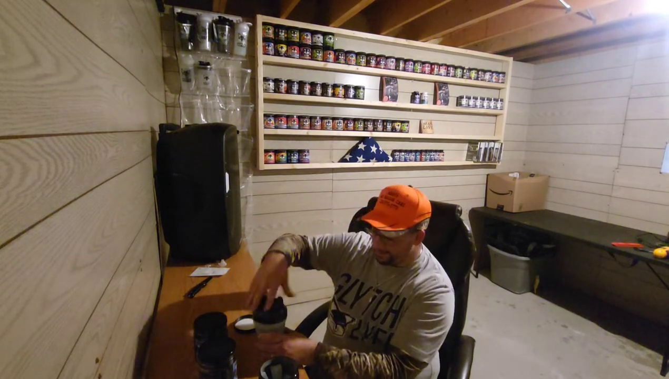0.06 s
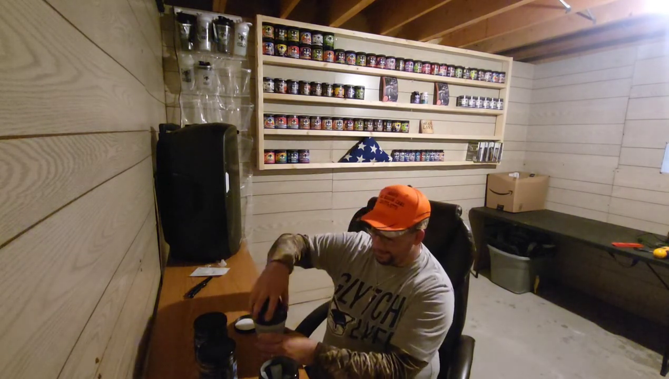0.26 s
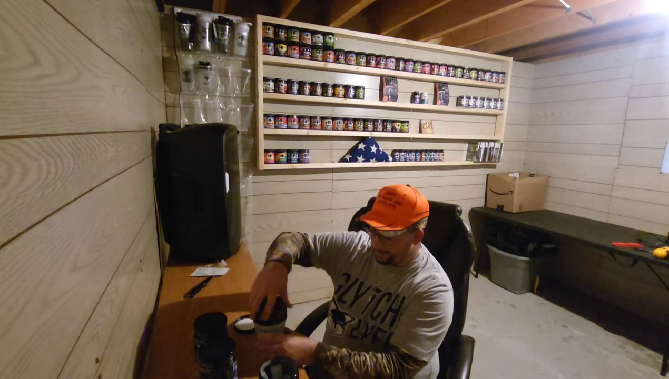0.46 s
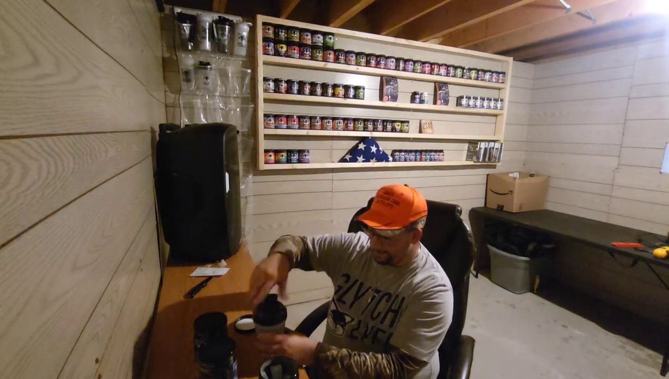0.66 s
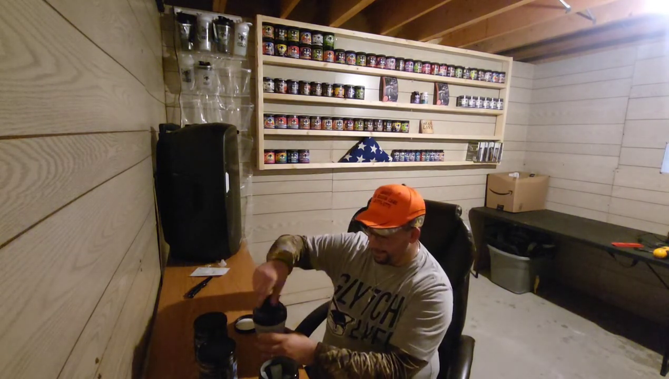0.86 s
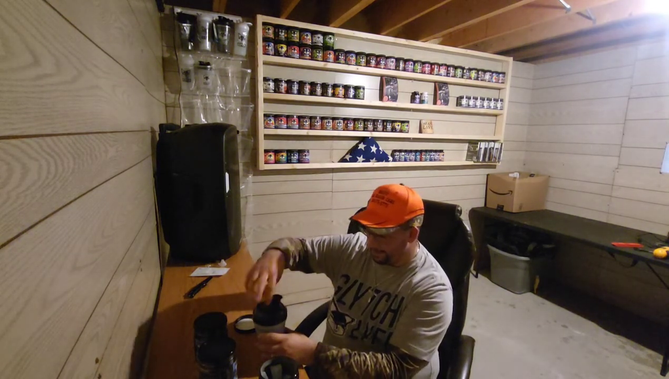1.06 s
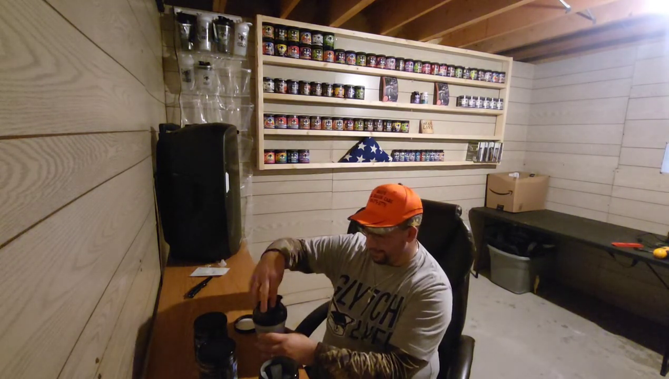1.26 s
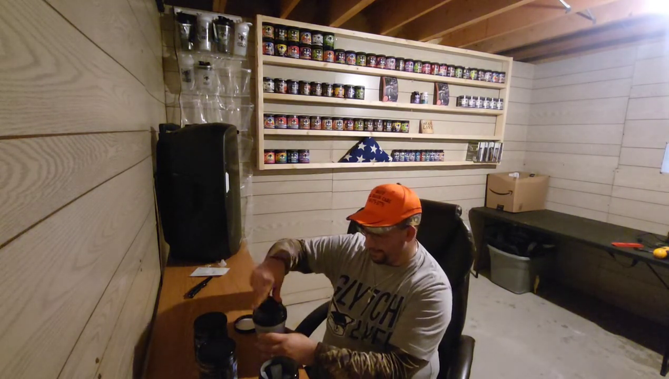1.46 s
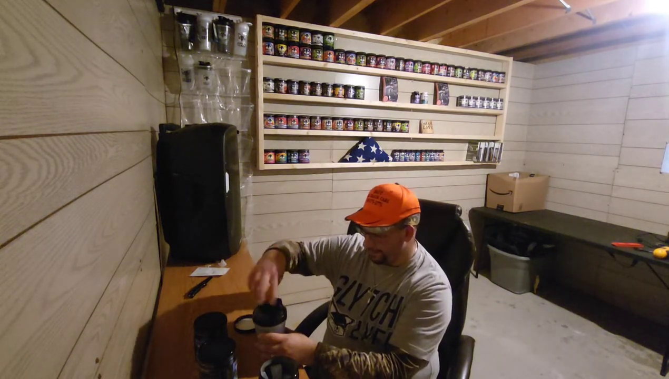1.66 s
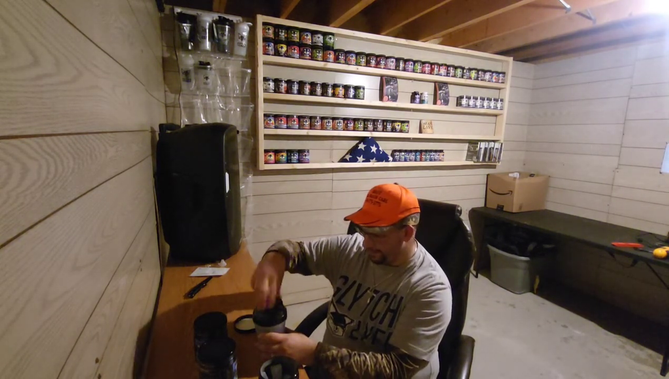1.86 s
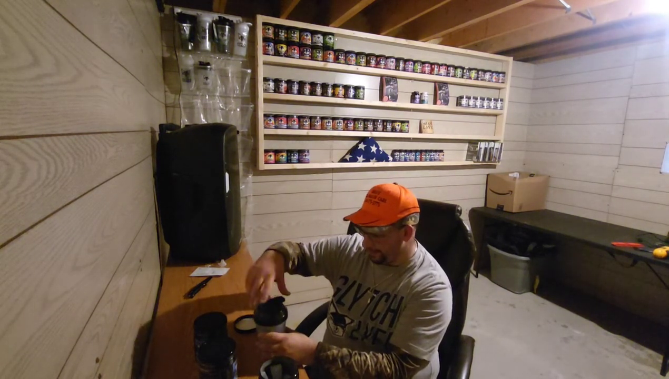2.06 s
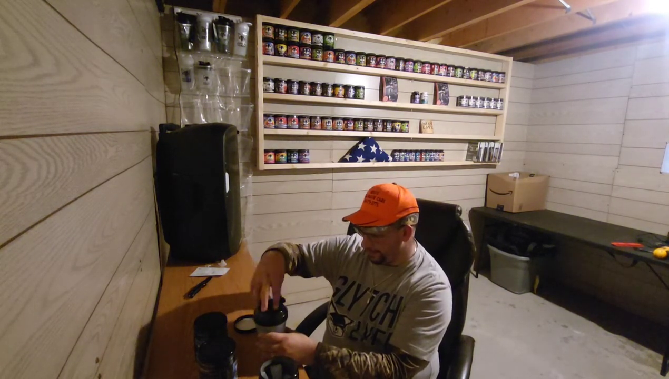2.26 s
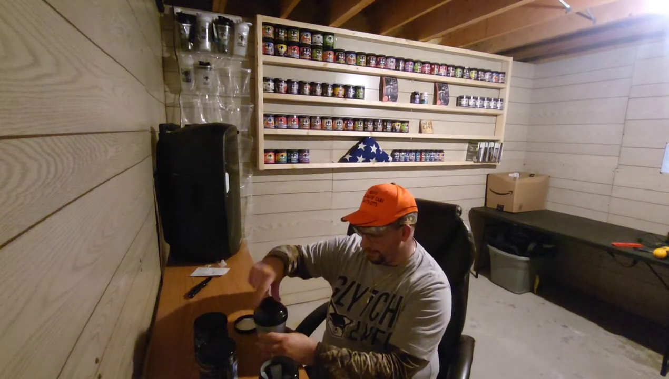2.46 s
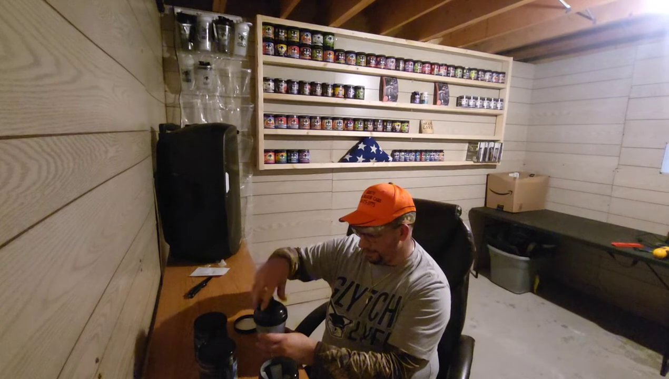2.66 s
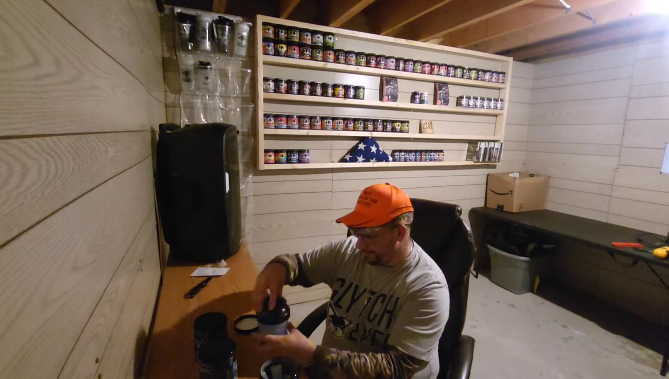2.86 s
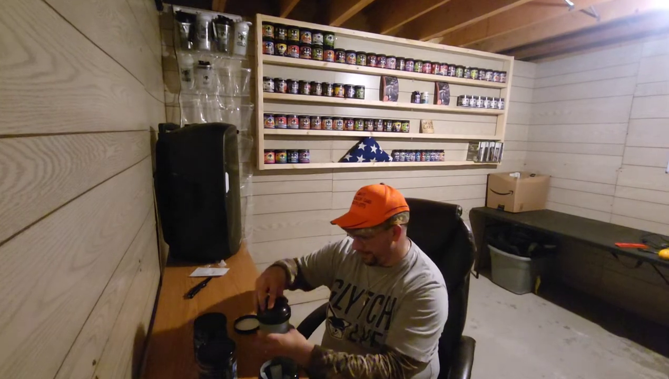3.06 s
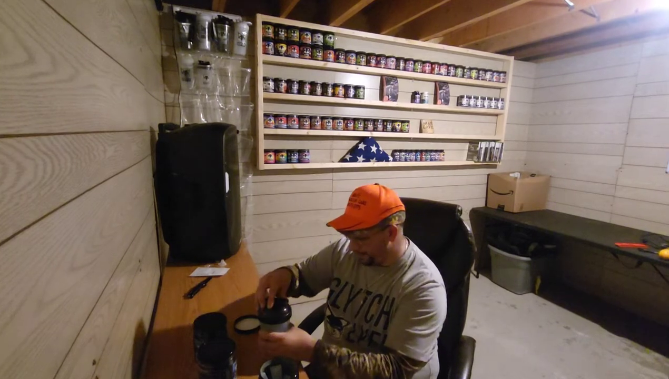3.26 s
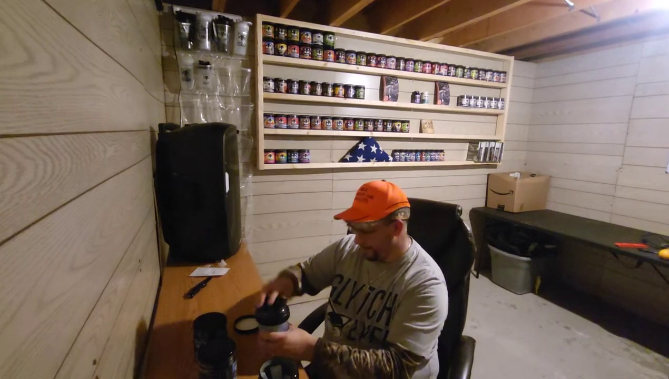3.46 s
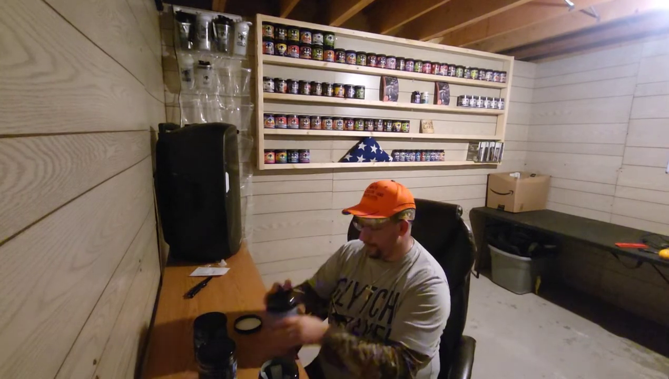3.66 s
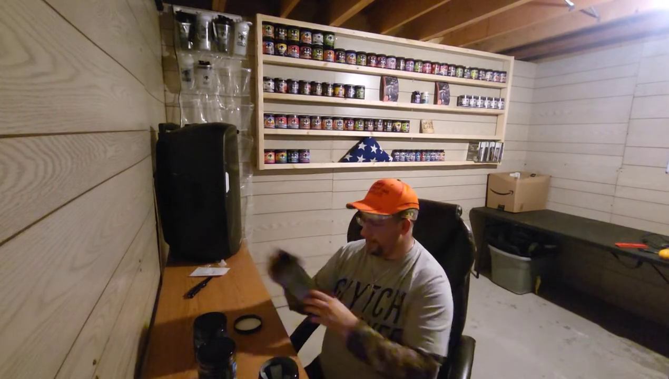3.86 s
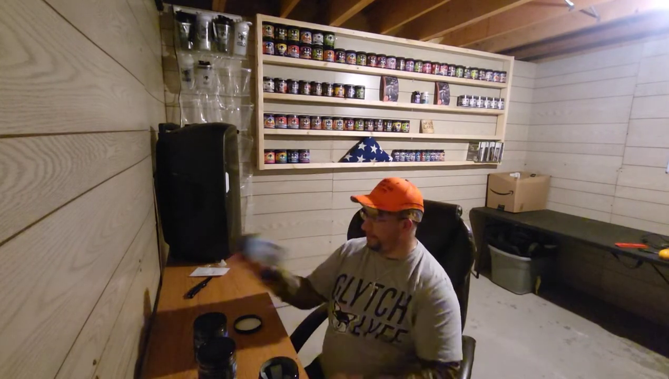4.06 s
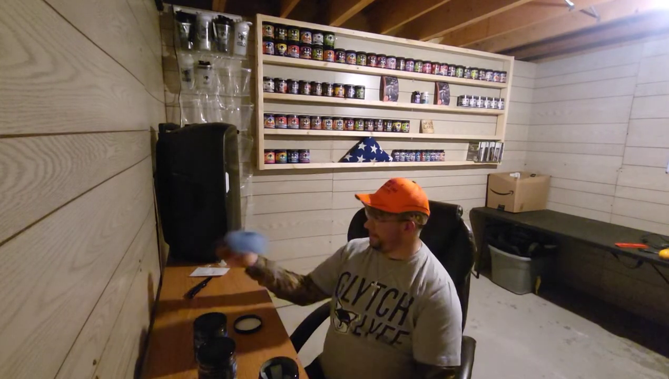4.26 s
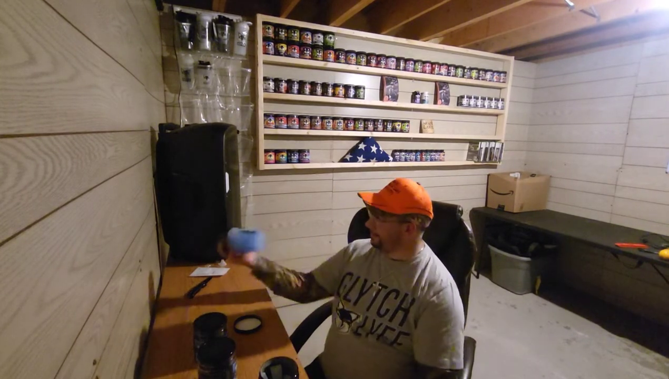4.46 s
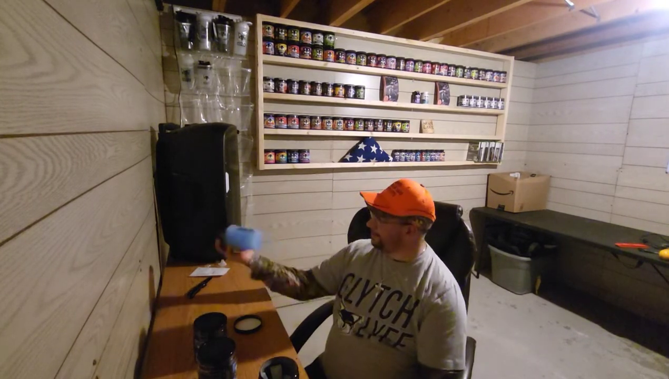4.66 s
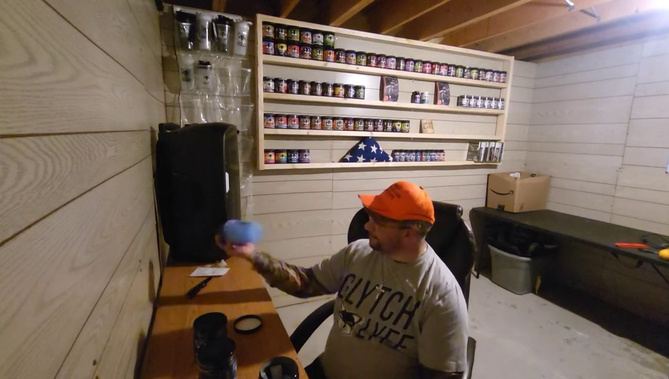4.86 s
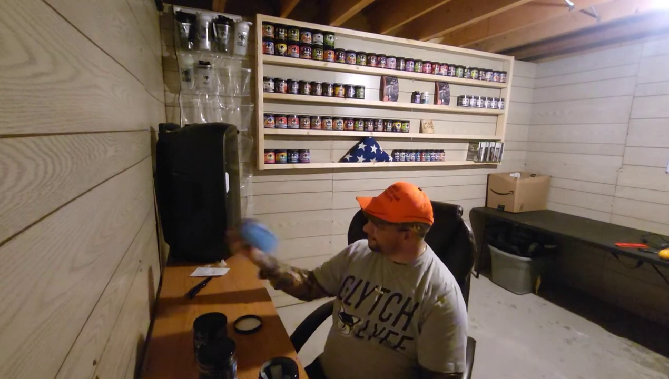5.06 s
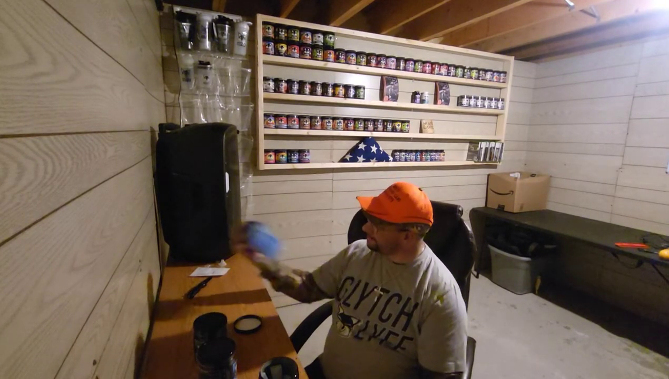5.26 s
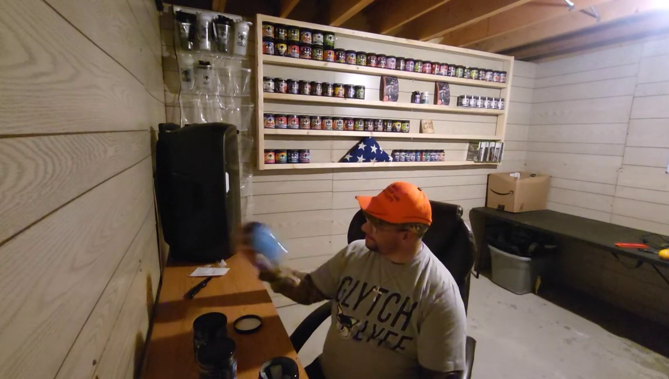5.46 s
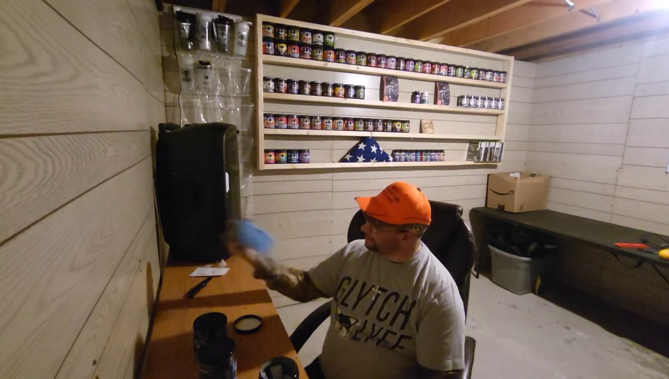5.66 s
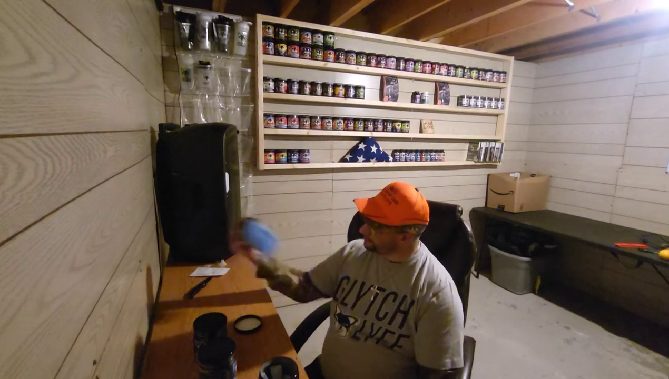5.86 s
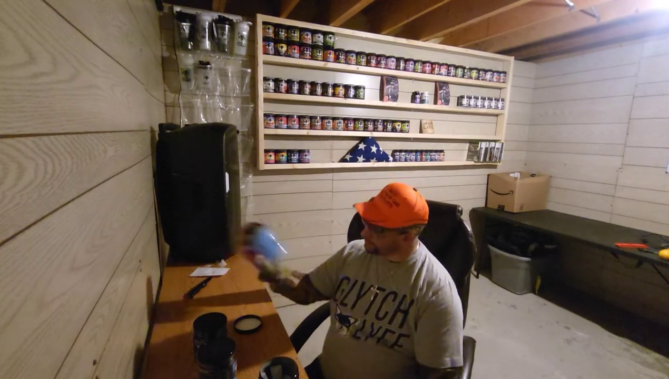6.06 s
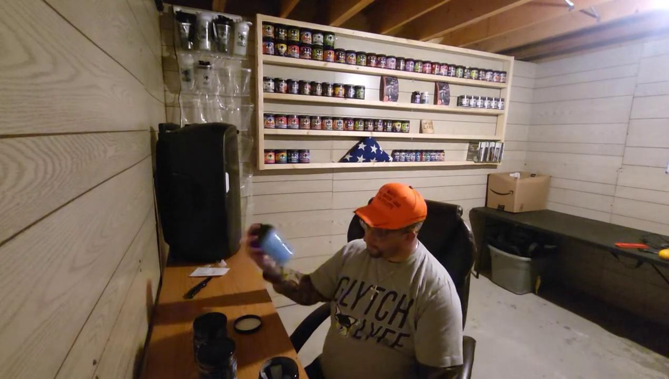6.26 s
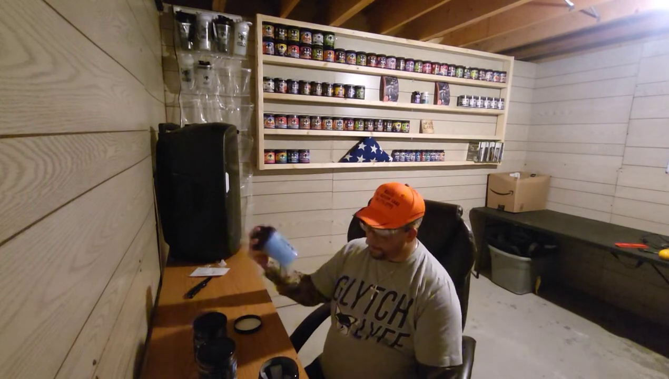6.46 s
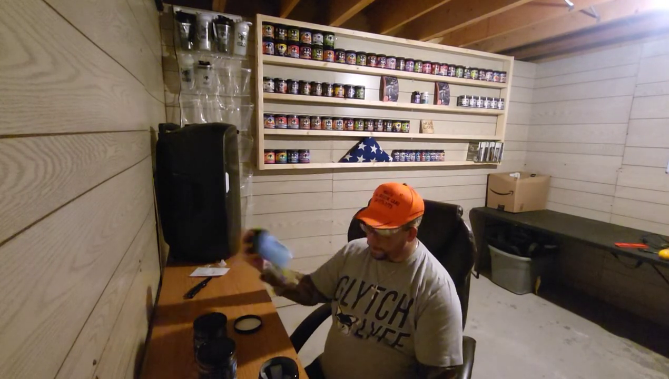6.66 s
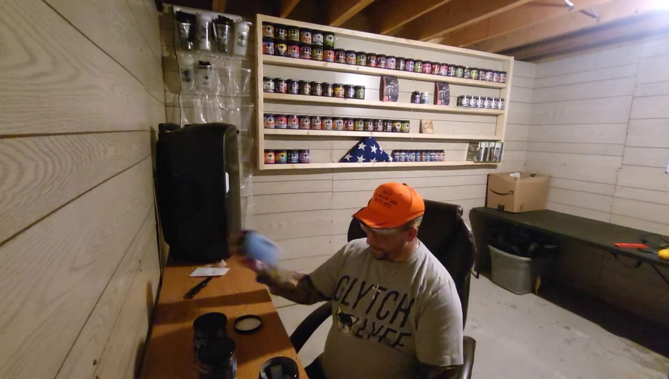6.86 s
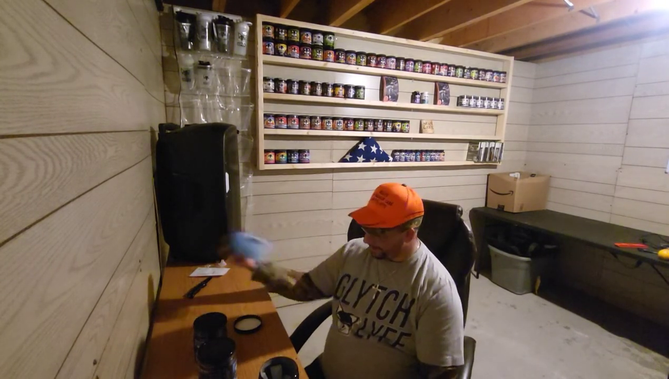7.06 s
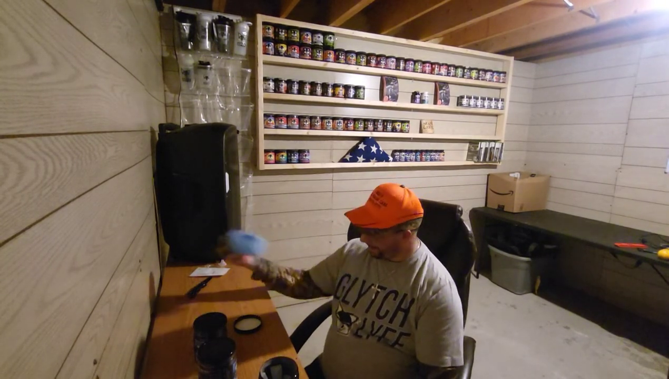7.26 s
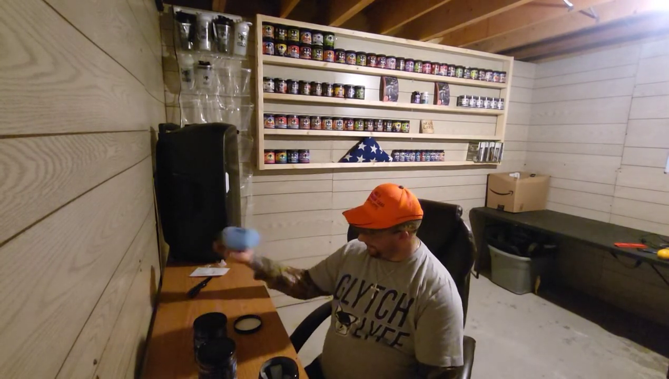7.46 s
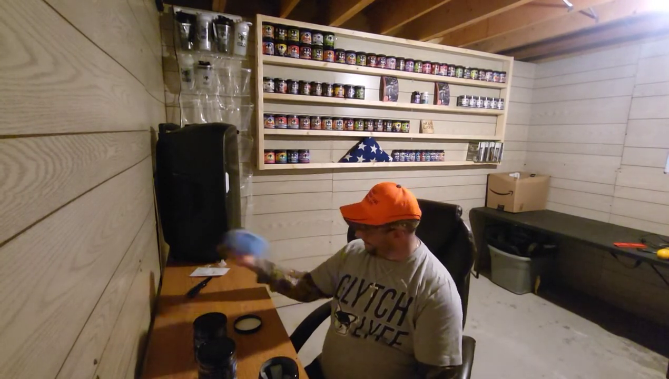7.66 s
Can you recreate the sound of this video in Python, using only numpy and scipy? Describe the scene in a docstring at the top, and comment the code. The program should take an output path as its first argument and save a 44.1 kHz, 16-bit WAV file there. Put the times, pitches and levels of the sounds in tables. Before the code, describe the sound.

A faint, low hush fills a small room with hard walls. From the start until about 3.4 seconds, a lid is rubbed and pressed onto a plastic shaker cup: short, soft scrapes alternate with irregular clicks, hollow knocks and dull thuds through a desk. The clearest pushes come near 0.4, 1.1, 1.6, 2.1 and 2.6 seconds, and some make the ice inside chime thinly. At about 3.8 seconds one cube ticks as the cup is lifted. From about 4.1 seconds to the end, near 7.6 seconds, the cup is shaken hard, much louder than before, at nearly five back-and-forth shakes a second. Ice cubes clack and crunch against the plastic while water splashes, slaps and now and then gulps air. Everything is heard from fairly near, with a short room echo.

```python
"""A plastic shaker cup of ice and water in a small, quiet basement room with hard walls.
First the lid is rubbed and pushed on: it scrapes and clicks, the cup thuds on the desk, the ice chimes.
Near 3.8 s one cube slips as the cup is lifted. From about 4 s to 7.6 s the cup is shaken hard.
Two strokes take turns: a return slaps the water back and often gulps air, and a throw cracks
the ice on the far end under a swell of spray."""
import sys
import numpy as np
from scipy import signal
from scipy.fft import rfft, irfft, next_fast_len
from scipy.io import wavfile
from scipy.ndimage import map_coordinates

SR = 44100
rng = np.random.default_rng(int(sys.argv[2]) if len(sys.argv) > 2 else 0)


def transcribe(signal):
    """Save signal, clipped to [-1, 1], as a 16-bit WAV file at the path in sys.argv[1]."""
    frames = np.atleast_2d(signal).T
    limited = np.clip(frames, -1, 1)
    pcm = np.round(limited * 32767).astype(np.int16)
    wavfile.write(sys.argv[1], SR, pcm)


N = 340011


def amp(db):
    """Turn decibels (dB) into a number to multiply by."""
    return 10 ** (np.asarray(db) / 20)


def unit(x):
    """Scale x to an average power of 1."""
    return x / np.sqrt(np.mean(x ** 2) + 1e-20)


def along(points, hz):
    """Read between (Hz, value) points, with octaves evenly spaced."""
    freqs, values = np.transpose(points)
    return np.interp(np.log(hz + 1), np.log(freqs + 1), values)


def add(track, s, x):
    """Mix x into the track, starting at s seconds."""
    part = track[..., max(round(s * SR), 0):][..., :x.shape[-1]]
    part += x[..., :part.shape[-1]]


def filtered(x, response):
    """Multiply each frequency in x by response(hz)."""
    size = next_fast_len(x.shape[-1] + SR // 4)
    return irfft(rfft(x, size) * response(np.fft.rfftfreq(size, 1 / SR)), size)[..., :x.shape[-1]]


def coloured(x, points, size=4096):
    """Give x the tone drawn by (Hz, dB) points, using a filter of energy 1."""
    cepstrum = irfft(np.log(amp(along(points, np.fft.rfftfreq(size, 1 / SR)))))
    cepstrum[1:size // 2] *= 2  # folded so that nothing sounds before a hit
    cepstrum[size // 2 + 1:] = 0
    kernel = irfft(np.exp(rfft(cepstrum)))
    return signal.oaconvolve(x, kernel / np.linalg.norm(kernel))[:len(x)]


def resonated(x, modes, size=16384):
    """Let x ring an object whose notes are given as (pitch Hz, width Hz, dB); narrow ones last longer."""
    f = np.fft.rfftfreq(size, 1 / SR)
    kernel = irfft(sum((-1) ** k * amp(db) * 1j * f * width / (hz * hz - f * f + 1j * f * width)
                       for k, (hz, width, db) in enumerate(modes)))
    return signal.oaconvolve(x, kernel / np.linalg.norm(kernel))[:len(x)]


def grains(rate, spread_db, smooth):
    """Tiny hits of random size, about `rate` a second, mixed with smooth noise."""
    hits = (rng.random(N) < rate / SR) * rng.choice([-1, 1], N)
    sizes = amp(spread_db * np.clip(rng.standard_normal(N), -2, 2))
    return unit(unit(hits * sizes) + smooth * rng.standard_normal(N))


def contact(chatter, t60):
    """A blow and a brief chatter of two surfaces; t60 is the seconds taken to fade by 60 dB."""
    t = np.arange(SR // 10) / SR
    blow = rng.standard_normal(len(t)) * amp(-60 * t / t60)
    blow *= chatter / np.linalg.norm(blow)
    blow[0] = 1
    phase = np.angle(rfft(blow, 2 * len(t)))
    blow = irfft(np.exp(1j * phase))[:len(t)]  # all frequencies equally strong, so no pitch
    return blow / np.linalg.norm(blow)


# The room's background. Each row: frequency in Hz, level in dB.
HUSH_TONE = [(25, -9), (130, -13), (400, -13.5), (1000, -23.5), (5000, -33), (15000, -40.5)]
def hush():
    """A faint, low noise fills the room throughout."""
    return amp(-68.5) * np.array([coloured(rng.standard_normal(N), HUSH_TONE) for _ in range(2)])


def slide_pressure(length, growth_db=8, attack_s=0.017, release_s=0.035):
    """The pressure of one slide starts quickly, grows steadily, then lets go."""
    t = np.arange(SR) / SR
    growth = amp(growth_db * np.minimum(t / length - 1, 0))
    return (1 - np.exp(-t / attack_s)) * growth * np.exp(-np.maximum(t - length, 0) / release_s)


# The three tones of sliding plastic. Each row: frequency in Hz, level in dB.
SCRAPE_TONE = [(300, -10.5), (700, -2.5), (1400, 9), (2500, 6.5), (4000, 0), (6300, 1), (8300, -16.5),
               (11000, -15), (15500, -32)]
HISS_TONE = [(150, -53), (1000, -19.5), (3000, 3.5), (6300, 5.5), (8300, -7), (11000, 2), (15500, -7)]
RUMBLE_TONE = [(25, -29), (80, -16), (150, 6), (330, 4), (480, -7.5), (800, -3.5), (1200, -27), (3000, -44),
               (8000, -40.5)]
# Lid, fingers and sleeve slide. Each row: start and end in seconds, then rumble, scrape and hiss in dB.
SLIDES = [(0.034, 0.07, -50, -52, -82), (0.245, 0.256, -43.5, -53, -78), (.59, 0.661, -48, -44.5, -58),
          (0.865, 0.903, -44, -52, -86), (0.969, 1.054, -46, -52, -72), (1.296, 1.302, -46.5, -58, -70),
          (1.47, 1.534, -38, -39, -53), (1.899, 1.97, -53.5, -68, -100), (1.983, 2.114, -44, -54, -52.5),
          (2.524, 2.565, -41, -50, -57.5), (2.729, 2.831, -51, -64.5, -90), (2.947, 3.002, -48, -44, -95),
          (3.16, 3.34, -64, -60, -81), (3.627, 3.823, -54, -54, -79), (3.959, 4.002, -61.5, -44, -88)]
def rubbing():
    """Sliding plastic sticks and slips: a scrape and a fine hiss above the rumble of the cup."""
    rumble, scrape, hiss = np.zeros((3, N))
    for start, end, rumble_db, scrape_db, hiss_db in SLIDES:
        pressure = slide_pressure(end - start)
        add(rumble, start, amp(rumble_db) * pressure)
        add(scrape, start, amp(scrape_db) * pressure ** 0.65)
        add(hiss, start, amp(hiss_db) * pressure ** 3.4)  # only a tight fit hisses
    scrape = coloured(scrape * grains(rate=370, spread_db=2.5, smooth=1.0), SCRAPE_TONE)
    hiss = coloured(hiss * grains(rate=2200, spread_db=17, smooth=0.84), HISS_TONE)
    rumble = coloured(rumble * grains(rate=58, spread_db=-2.5, smooth=0.43), RUMBLE_TONE)
    return amp(-7.5) * scrape + amp(10) * hiss + rumble


# Notes of the thud, which include the room's low standing waves near 74 and 135 Hz, then of the lid's rim and
# of the air in the cup. Each row: pitch in Hz, width in Hz, level in dB.
THUD_NOTES = [(56, 16, -11), (73.8, 7.9, -0.5), (135.4, 13.8, 3), (164, 18, -2), (198, 56, -2),
              (251.4, 46, -1.5), (333, 122, -1.5), (381, 192, -5.5)]
RIM_NOTES = [(1220, 140, 5.5), (1560, 140, 8), (2090, 55, -12), (2550, 214, 10), (3420, 30, -8),
             (4300, 21, 8.5), (5090, 53, -6.5)]
AIR_NOTES = [(584, 90, 0.5), (686, 110, -2), (815, 85, -6.5)]
# The tones of a knock on the cup and of a sharp click. Each row: frequency in Hz, level in dB.
KNOCK_TONE = [(100, -14), (340, 8.5), (460, -9.5), (600, 2), (720, 2.5), (825, 3.5), (950, -2.5),
              (1300, -9), (1800, -15.5), (2600, -25.5), (4000, -47), (9000, -76)]
CLICK_TONE = [(60, -32), (300, -19), (1200, -7), (2000, 1.5), (2550, -1), (3000, -4.5), (4200, 0),
              (6500, -4), (8300, -15.5), (11000, -12), (15500, -22.5)]
# Pushes on the lid. Each row: start in seconds, then desk thud, cup knock, rim click and air ring in dB.
PUSHES = [(0.269, -11, -19, -37, -21), (0.328, -4.5, -32, -27, -14), (0.368, -3.5, -9.5, -5.5, -19),
          (.478, -14, -23, -42, -32), (.584, -10.5, -14.5, -16.5, -8.5), (0.943, -10, -29, -17.5, -11),
          (1.014, -14, -18.5, -22.5, -33), (1.069, -7, -2.5, -0.5, -21), (1.339, -19, -40, -33, -43),
          (1.58, -2, -1, 2, -22), (1.983, -25.5, -31, -40, -27), (2.119, 8.5, -5, 1.5, -5),
          (2.131, -21, 6.5, -24, -5), (2.148, 2.5, 1.5, -12, -18), (2.58, -3, -10.5, -41, -23),
          (2.648, 7.5, 2, -34, -12), (2.933, -0.5, -14, -46, -20), (2.953, -7, -18, -42, -17),
          (3.101, -14.5, -22, -20, -26.5), (3.127, -32, -13.5, -8.5, -25), (3.367, -39, -30.5, -31, -45)]
def lid():
    """Each push thuds through the desk, knocks the hollow cup and clicks the rim."""
    thud, knock, click, air, rim = np.zeros((5, N))
    for s, thud_db, knock_db, click_db, air_db in PUSHES:
        add(air, s, amp(air_db - 2) * contact(chatter=3, t60=0.1))
        grip_shift = 1 + 0.053 * rng.uniform(-1, 1)  # each grip changes the rim's pitch
        gripped = [(hz * grip_shift, width, db) for hz, width, db in RIM_NOTES]
        add(thud, s, amp(thud_db) * contact(chatter=0.49, t60=0.052))
        # the rim first catches lightly, snaps home, then slips a little further
        for delay, touch_db in [(-.004, -13), (0, 0), (.007, -13.5), (.019, -21.5)]:
            add(knock, s + delay, amp(knock_db + touch_db) * contact(chatter=1.57, t60=0.052))
            snap = amp(click_db + touch_db) * contact(chatter=0.99, t60=0.021)
            add(click, s + delay, snap)
            add(rim, s + delay, resonated(snap, gripped, size=4096))
    for s, _, rumble_db, _, _ in SLIDES:  # the fingers land softly as each slide starts
        add(thud, s, amp(rumble_db + 27.5) * contact(chatter=0.23, t60=0.072))
        add(knock, s, amp(rumble_db + 17.5) * contact(chatter=3.4, t60=0.1))
    desk = filtered(resonated(thud, THUD_NOTES), lambda hz: 1 / (1 + 1j * hz / 900) ** 2)  # dull the treble
    cup = resonated(air, AIR_NOTES) + coloured(knock, KNOCK_TONE)
    return desk + cup + amp(-2) * coloured(click, CLICK_TONE) + amp(-3) * rim


# The notes in one chime. Each row: multiple of the pitch, level in dB, seconds to fade by 60 dB.
CHIME_NOTES = [(0.999, 8, 0.11), (1.053, -5, 0.4), (1.65, -6, 0.12)]
# Ice is jolted in the resting cup. Each row: start in seconds, level in dB, pitch in Hz.
JOLTS = [(.368, -51.5, 2090), (1.071, -43, 2446), (1.578, -44.5, 2185), (2.121, -49, 2400)]
def chimes():
    """A jolted cube rings thinly after a push; the moving water makes its notes waver."""
    out = np.zeros(N)
    t = np.arange(SR) / SR
    for s, db, hz in JOLTS:
        wander = np.cumsum(rng.standard_normal((len(CHIME_NOTES), SR)), axis=1) * 9 / np.sqrt(SR)
        for (ratio, note_db, t60), phase in zip(CHIME_NOTES, wander):
            fade = amp(db + 3.5 + note_db - 60 * t / t60)
            add(out, s, fade * np.sin(2 * np.pi * hz * ratio * t + phase))
    return out


REPEAT_S, REPEAT_DB = .009, -4.5  # a softer repeat of each clack 9 ms later, like a close echo
# The notes of one loose cube. Each row: pitch in Hz, width in Hz, level in dB.
CLINK_NOTES = [(2290, 60, 3), (2560, 180, 6), (3630, 230, -7), (5600, 260, -1), (6480, 390, -4.5)]
def clink(start_s=3.834, db=-14.5):
    """One cube slips as the cup is lifted and ticks against the wall; a softer repeat follows."""
    ticks = np.zeros(N)
    add(ticks, start_s, amp(db) * contact(chatter=1.1, t60=0.026))
    add(ticks, start_s + REPEAT_S, amp(db + REPEAT_DB) * contact(chatter=0.9, t60=0.017))
    return resonated(ticks, CLINK_NOTES) + amp(-4) * coloured(ticks, CLICK_TONE)


CUP_HZ = 2253  # the cup wall's own pitch
# The notes of ice hitting the wall. Each row: multiple of the clack's pitch, width in Hz, level in dB.
CLACK_NOTES = [(.82, 487, -9), (1, 397, 2.5), (1.85, 298, -18), (2.25, 300, -9), (2.7, 298, -19)]
def cube_strikes(strikes, reach_hz=130):
    """Each clean clack has a softer, blurred repeat; a clack near the wall's pitch leaves it ringing."""
    clacks, cracks, pings = np.zeros((3, N))
    for s, clack_db, crack_db, hz in strikes:
        notes = [(hz * ratio, width, db) for ratio, width, db in CLACK_NOTES]
        for at, offset_db, chatter in [(s, 0, .45), (s + REPEAT_S, REPEAT_DB, 1.6)]:
            clack = resonated(contact(chatter, t60=0.063), notes, size=4096)
            add(clacks, at, amp(clack_db + offset_db) * clack)
            add(cracks, at, amp(crack_db + offset_db) * contact(chatter, t60=0.04))
        nearness = 1 / (1 + ((hz - CUP_HZ) / reach_hz) ** 2)
        add(pings, s, np.array([amp(clack_db + 1) * nearness]))
    return clacks + coloured(cracks, CLICK_TONE) + resonated(pings, [(CUP_HZ, 24, 0)])


# Large cubes strike. Each row: start in seconds, clack in dB, crack in dB, clack pitch in Hz.
LARGE_STRIKES = [(3.972, -25, -36, 2250), (4.159, -6.5, -13, 2180), (4.222, 2, -1, 1980),
                 (4.303, -4.5, -17, 1900), (4.423, 0, -11, 1940), (4.605, -4.5, -11, 2250),
                 (4.826, -3, -9, 2170), (5.002, 0.5, -12, 2070), (5.051, -9, -9, 2100),
                 (5.256, -2, -6, 1990), (5.466, 2, -8, 2210), (5.641, -0.5, -4, 2520),
                 (6.645, -6, -10, 1900), (6.71, -3.5, -14, 2130), (6.978, -8, -8, 2130),
                 (7.186, -0.5, -16, 2130), (7.403, 7, -3, 2260), (7.447, -6, -20, 2330)]
def large_cubes():
    """The big pieces of ice clack against the wall one at a time."""
    return cube_strikes(LARGE_STRIKES)


def swells(rows):
    """The joint level of overlapping swells. Each row: peak, rise and fall in seconds, level in dB."""
    t = np.arange(0, N, 32) / SR
    power = 0
    for peak, rise, fall, db in rows:
        fade = np.where(t < peak, ((t - peak) / rise) ** 2, (t - peak) / fall)
        power = power + amp(db) ** 2 * np.exp(-2 * fade)
    return np.interp(np.arange(N) / SR, t, np.sqrt(power))


# Water slaps the near end. Each row: arrival in seconds, splash in dB, thump in dB.
RETURN_STROKES = [(4.166, -30.5, -27), (4.3, -37, -31), (4.516, -26, -3), (4.737, -24, 4),
                  (4.944, -24.5, -2), (5.16, -26, -11), (5.365, -26, -11.5), (5.58, -22.5, -18),
                  (5.804, -27.5, -5), (5.993, -24.5, -12), (6.21, -24, -0.5), (6.424, -26.5, -5),
                  (6.643, -24, -5.5), (6.856, -24.5, -5), (7.122, -28, -5), (7.309, -29, -3.5),
                  (7.55, -30.5, -12)]
# Ice and spray hit the far end. Each row: arrival in seconds, seconds to the peak, spray and crunch in dB.
THROW_STROKES = [(4.222, 0.011, -25.5, 0.5), (4.401, 0.023, -24, -4.5), (4.597, 0.046, -24, -10),
                 (4.803, 0.042, -24.5, -24), (5.002, 0.05, -28, -2.5), (5.24, 0.029, -24, -8.5),
                 (5.452, 0.028, -26.5, -7), (5.64, 0.079, -26, -6.5), (5.864, 0.033, -25.5, -8),
                 (6.067, 0.042, -25, -5), (6.314, 0.016, -26.5, -3.5), (6.505, 0.042, -27, -14),
                 (6.71, 0.057, -26, -9), (6.966, 0.014, -26, -2), (7.168, 0.039, -27.5, -18),
                 (7.405, 0.093, -31.5, -24), (7.617, 0.033, -26.5, -11)]
def water_force(throw_db, slap_db):
    """Throws swell slowly; returns slap at once and leave the water tumbling."""
    throws = [(s + lag, 1.12 * lag, 0.022, db + throw_db) for s, lag, db, _ in THROW_STROKES]
    slaps = [(s + 0.012, 0.018, 0.015, db + slap_db) for s, db, _ in RETURN_STROKES]
    tumbling = [(s + 0.06, 0.03, 0.2, db - 12) for s, db, _ in RETURN_STROKES]
    return swells(throws + slaps + tumbling)


# The tones of bright spray and of low sloshing. Each row: frequency in Hz, level in dB.
SPRAY_TONE = [(100, -51), (500, -33), (900, 0), (1300, -0.5), (1800, 0.5), (2250, -1.5), (2800, -3),
              (5000, -5.5), (6500, -8.5), (8300, -20.5), (10500, -19.5), (15500, -24)]
SLOSH_TONE = [(30, -78), (90, -46), (130, -14.5), (180, -3), (380, 4), (620, 8), (730, 3.5), (860, 6.5),
              (1300, -5.5), (2200, -7.5), (5000, -61)]
def splashing(ring_growth_db_per_s=2.5):
    """Each stroke throws spray and ice chips over a low slosh of water, and keeps the wall ringing."""
    force = water_force(throw_db=-0.5, slap_db=-0.5)
    spray = force * grains(rate=1700, spread_db=17, smooth=0.24)
    # fine fizz follows every stroke, a little stronger at the loud peaks
    fizz = force * (force / force.max()) ** 0.26 * grains(rate=2400, spread_db=28, smooth=0.15)
    slosh = water_force(throw_db=-3.5, slap_db=0.5) * grains(rate=500, spread_db=2.0, smooth=0.56)
    since_first_throw = np.arange(N) / SR - THROW_STROKES[0][0]
    wall = amp(-19.5 + ring_growth_db_per_s * since_first_throw) * resonated(spray, [(CUP_HZ, 130, 0)])
    return (wall + amp(1.5) * coloured(spray, SPRAY_TONE) + amp(-16.5) * coloured(fizz, HISS_TONE)
            + amp(-2.5) * coloured(slosh, SLOSH_TONE))


def crunch(early_s=.005, spread_s=.024):
    """A cluster of wet ice chips crunches at the start of every stroke."""
    cracks = np.zeros(N)
    strokes = [(s, db) for s, _, _, db in THROW_STROKES]
    strokes += [(s, splash_db + 15.5 + 0.67 * thump_db) for s, splash_db, thump_db in RETURN_STROKES]
    for s, db in strokes:
        add(cracks, s, amp(db) * contact(chatter=6.2, t60=0.031))
        for when in rng.random(size=5):
            add(cracks, s - early_s + spread_s * when, amp(db - 9) * contact(chatter=3.9, t60=0.016))
    return coloured(cracks, CLICK_TONE)


def bubble(hz, cycles, glide):
    """A pocket of air rings and fades while its pitch rises."""
    t = np.arange(SR // 10) / SR
    age = t * hz / cycles
    pitch = hz * (1 + glide * (1 - np.exp(-age)))
    ring = np.sin(2 * np.pi * np.cumsum(pitch) / SR) * np.exp(-age)
    return ring / np.linalg.norm(ring)


# The notes of the cup when water hits it. Each row: pitch in Hz, width in Hz, level in dB.
THUMP_NOTES = [(410, 160, 10.5), (676, 430, -2)]
# Trapped air. Each row: start in seconds, level in dB, pitch in Hz, fading time in cycles.
AIR_POCKETS = [(4.167, 0.5, 404, 6.2), (4.202, -6, 407, 5), (4.74, 5.5, 603, 6.2), (4.945, 4.5, 427, 2.9),
               (5.582, -3, 610, 6.5), (5.599, -4.5, 730, 5.7), (5.611, -2.5, 840, 5), (5.627, -3, 990, 5),
               (6.214, -4, 606, 4.2), (6.427, -3.5, 524, 3.7), (6.522, -7, 450, 1.5), (6.645, 1, 388, 3),
               (6.663, 1.5, 650, 3.2), (6.857, -1, 1130, 3), (6.871, 1, 897, 4), (7.314, -6.5, 454, 3)]
def gulps():
    """The returning water thumps the cup, and now and then the water traps a pocket of air."""
    bubbles, thumps = np.zeros((2, N))
    for s, _, db in RETURN_STROKES:
        add(thumps, s, amp(db) * contact(chatter=1.09, t60=.028))
    for s, db, hz, cycles in AIR_POCKETS:
        add(bubbles, s, amp(db) * bubble(hz, cycles, glide=0.065))
    bass_cut = signal.butter(3, 230, "highpass", fs=SR, output="sos")  # a small cup gives off no bass
    return signal.sosfilt(bass_cut, bubbles + resonated(thumps, THUMP_NOTES))


def small_cubes(spread_s=.1, middle_hz=2080):
    """Each throw scatters three smaller cubes against the wall."""
    strikes = []
    for s, _, spray_db, _ in THROW_STROKES:
        for when, weakness, spot in rng.random(size=(3, 3)):
            db = spray_db - 6 * weakness
            hz = middle_hz * np.exp(0.32 * (spot - .5))
            strikes.append((s + spread_s * when, db + 11.5, db + 6.5, hz))
    return cube_strikes(strikes)


# How long the room echoes. Each row: frequency in Hz, seconds to fade by 60 dB.
ECHO_TIMES = [(70, 0.68), (180, 0.32), (500, 0.36), (1300, 0.42), (3400, 0.38), (9000, 0.28), (15000, 0.23)]
# How alike the left and right echoes are. Each row: frequency in Hz, likeness (1 means the same).
ECHO_LIKENESS = [(60, 0.79), (130, 0.95), (290, 1), (640, 0.23), (1400, -0.023), (3000, -0.13),
                 (15000, 0.037)]
def room_echo(build_s=0.0001):
    """Hard walls echo: left and right are alike in the bass and unrelated in the treble."""
    hz, t, noise = signal.stft(rng.standard_normal((2, SR // 2)), SR, nperseg=256)
    t60 = along(ECHO_TIMES, hz)[:, None]
    turn = np.arccos(np.clip(along(ECHO_LIKENESS, hz), -1, 1))[:, None] / 2
    fading = noise * amp(-60 * t / t60) / np.sqrt(t60)
    mid, side = signal.istft(fading * np.array([np.cos(turn), np.sin(turn)]), SR, nperseg=256)[1]
    onset = 1 - np.exp(-np.arange(len(mid)) / SR / build_s)
    echo = np.array([mid + side, mid - side]) * onset
    return echo * np.sqrt(2) / np.linalg.norm(echo)


def in_room(x, direct_db, echo_db, lead_ms=0, swing_ms=0, swing_hz=4.7):
    """Sound reaches the left side lead_ms sooner; the swinging hand varies that lead by swing_ms."""
    n = np.arange(N)
    lead_samples = (lead_ms + swing_ms * np.sin(2 * np.pi * swing_hz * n / SR)) * SR / 1000
    out = amp(direct_db) * np.array([map_coordinates(x, [n + side * lead_samples / 2]) for side in (1, -1)])
    hop = SR // 10
    for start in range(0, N, hop):  # a fresh echo every tenth of a second, as the cup moves
        piece = x[None, start:start + hop]
        if np.abs(piece).max() > 1e-6:
            add(out, start / SR, amp(echo_db) * signal.fftconvolve(piece, room_echo(), axes=1))
    return out


def scene():
    """The cup on the desk, then the cup in the air, over the hush of the room."""
    on_desk = in_room(rubbing() + lid() + chimes(), direct_db=-3.5, echo_db=0.5, lead_ms=0.032)
    lifted = in_room(clink(), direct_db=-1.5, echo_db=0.5)
    ice = large_cubes() + crunch() + small_cubes()
    rattle = in_room(ice, direct_db=1, echo_db=0, lead_ms=0.17, swing_ms=0.15)
    splash = in_room(splashing(), direct_db=-6.5, echo_db=0, lead_ms=0.27, swing_ms=0.12)
    gulping = in_room(gulps(), direct_db=-0.5, echo_db=-6, lead_ms=0.16)
    return hush() + on_desk + lifted + rattle + splash + gulping


# The balance of the two microphones. Each row: frequency in Hz, left minus right in dB.
MIC_BALANCE = [(1000, 0), (5000, .5), (8000, 0.5), (12000, -4.5), (15000, -8)]
def record(dry, top_hz=15500, cut_db_per_hz=.09):
    """The right microphone is brighter, and both lose the very highest treble."""
    def response(hz):
        balance_db = along(MIC_BALANCE, hz) * np.array([[.5], [-.5]])
        return amp(balance_db - cut_db_per_hz * np.maximum(hz - top_hz, 0))
    return filtered(dry, response)


dry = scene()
out = record(dry)
transcribe(out)
```